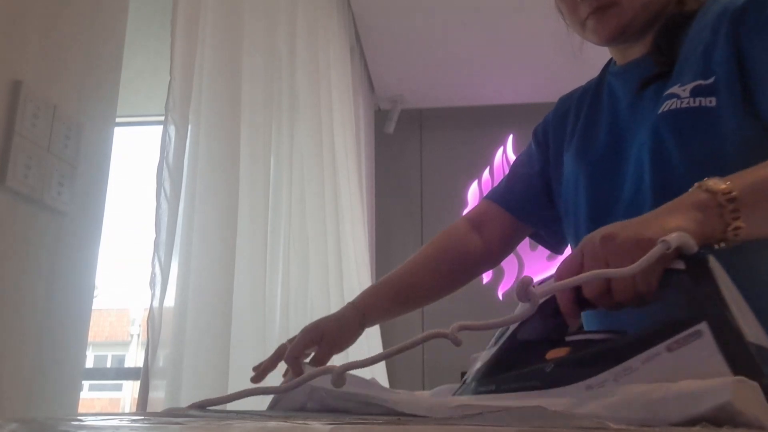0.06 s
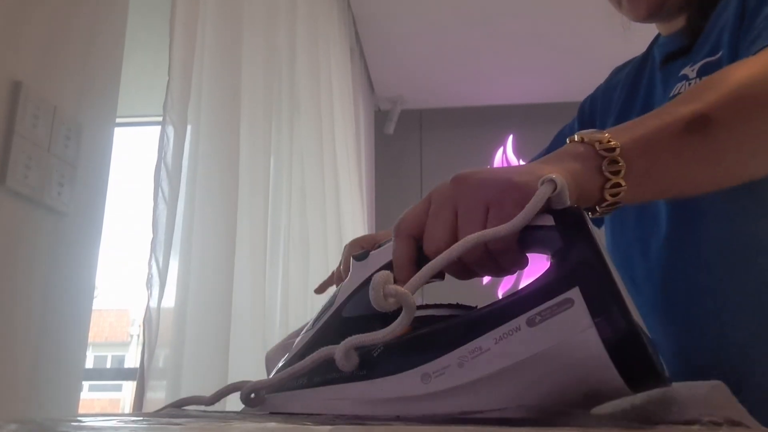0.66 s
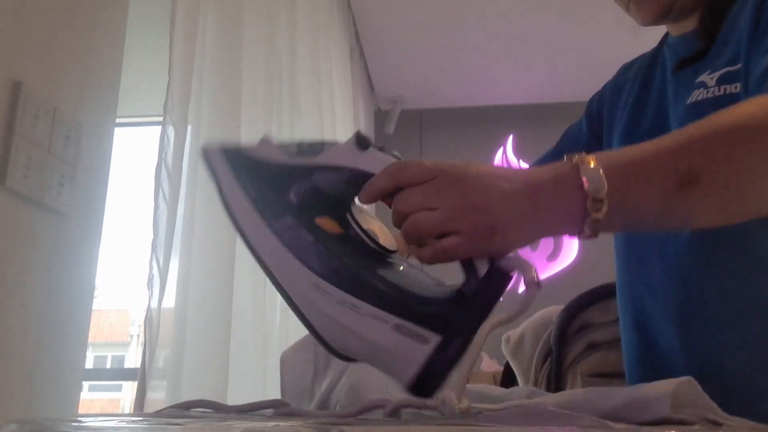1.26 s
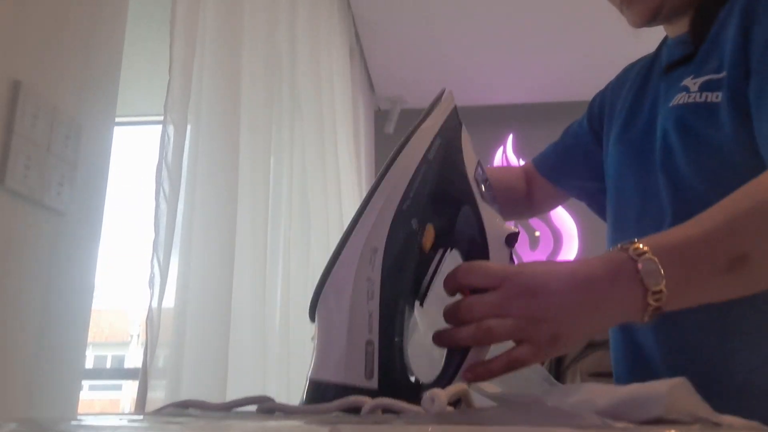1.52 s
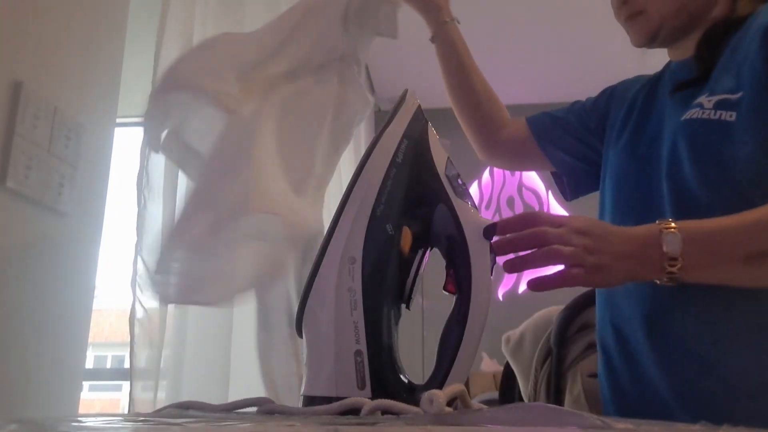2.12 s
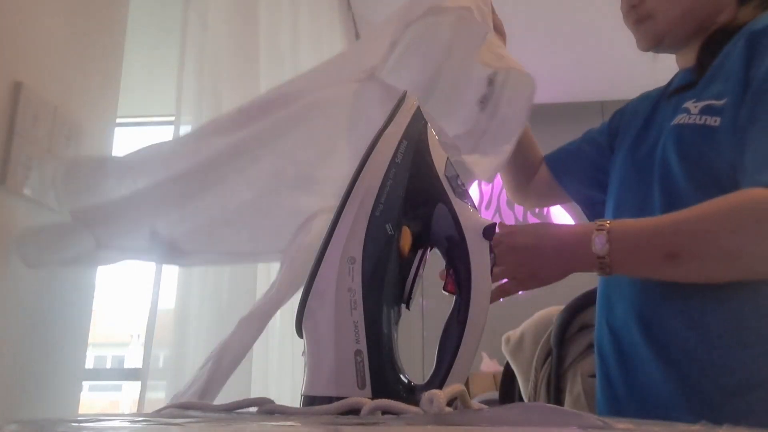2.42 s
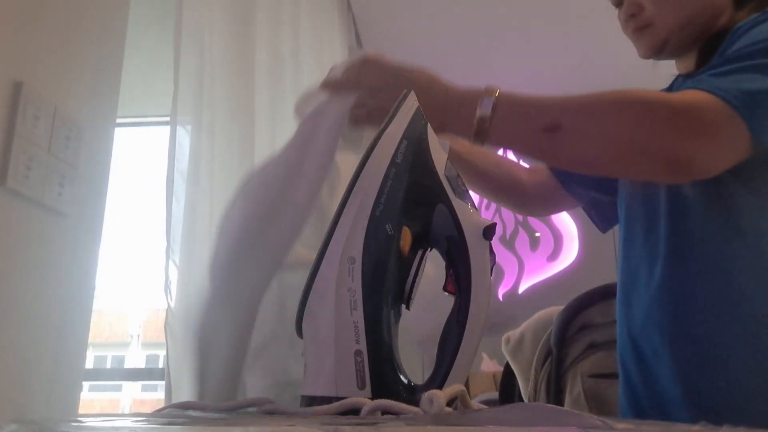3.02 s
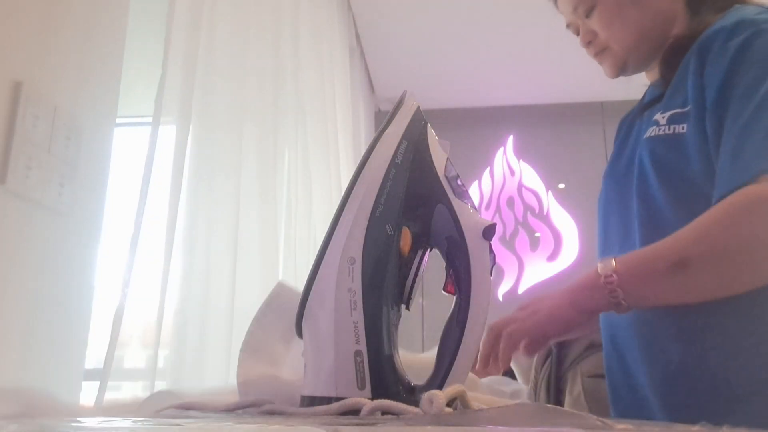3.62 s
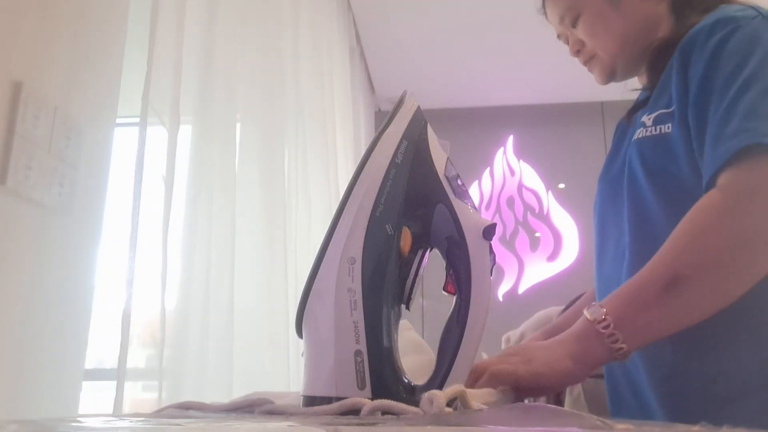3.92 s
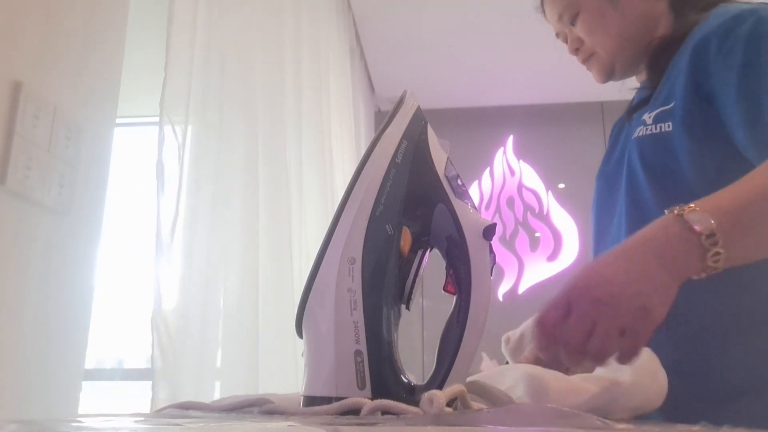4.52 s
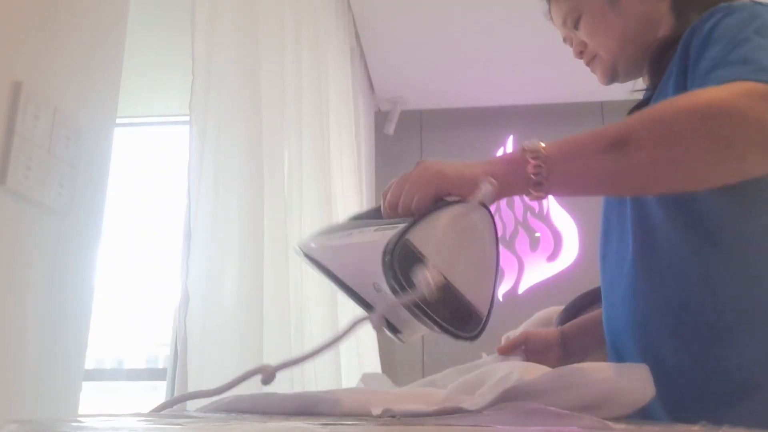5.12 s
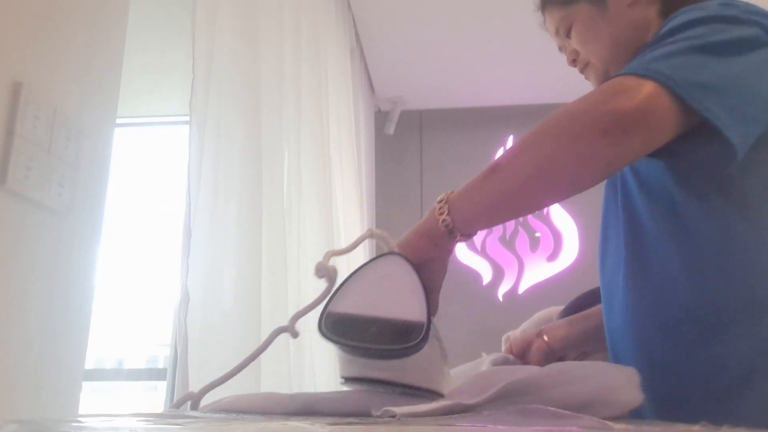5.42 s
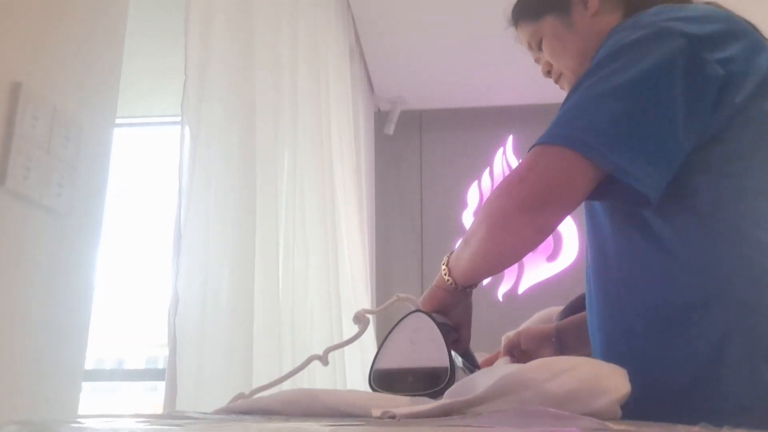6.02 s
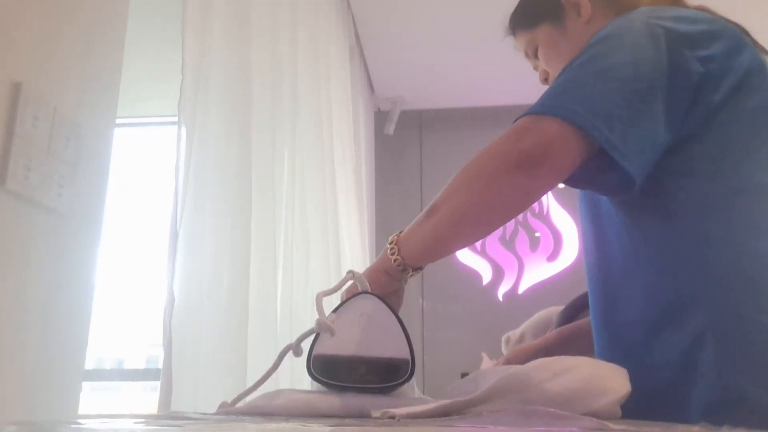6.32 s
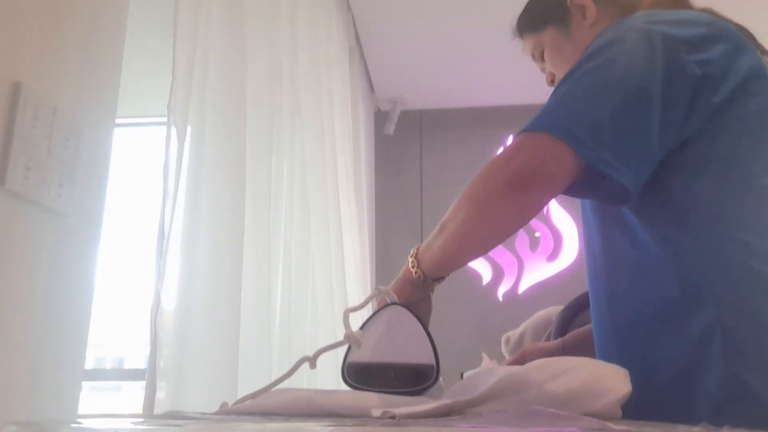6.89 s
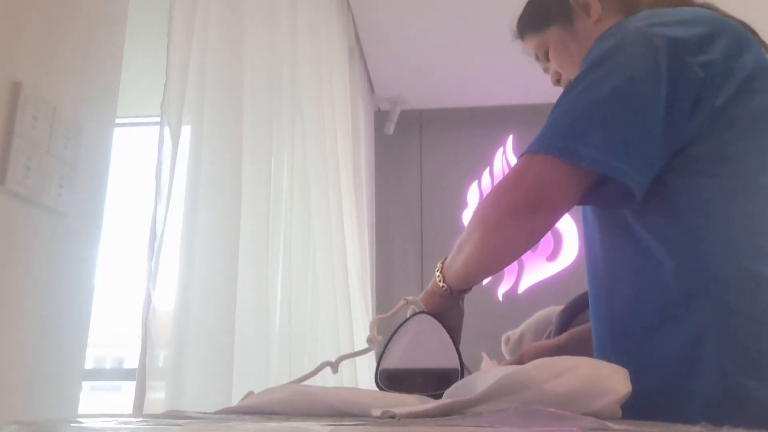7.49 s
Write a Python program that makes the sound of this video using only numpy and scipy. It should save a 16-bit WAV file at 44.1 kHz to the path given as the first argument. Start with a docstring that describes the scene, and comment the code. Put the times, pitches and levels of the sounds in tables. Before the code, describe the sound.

A steam iron slides softly over cloth, its plastic shell ticking and water sloshing inside. It is stood on its heel with a cluster of knocks that shake the springy ironing board, and a hollow hiss swells and fades. A shirt rustles faintly and lands with a dull thump. The iron bumps down again and slides on with small creaks, scrapes and glugs, heard close up in a small, quiet room.

```python
"""Ironing a shirt

A steam iron slides over cloth in a small room, is stood on its heel and rocks the springy board.
A steam-like hiss lingers. The shirt is shaken out, dropped and smoothed; the iron comes down and
slides again. As it moves, its shell ticks, creaks and scrapes and its tank sloshes and glugs."""
import sys
import numpy as np
from scipy import signal
from scipy.fft import rfft, irfft
from scipy.io import wavfile
from scipy.ndimage import uniform_filter1d

SR = 44100
rng = np.random.default_rng(int(sys.argv[2]) if len(sys.argv) > 2 else 0)


def wav_out(sig):
    """Save sig, one row per channel (or a flat mono array), as 16-bit PCM at SR to the path in sys.argv[1]."""
    wavfile.write(sys.argv[1], SR, np.round(np.clip(np.atleast_2d(sig).T, -1, 1) * 32767).astype(np.int16))


N = 341775
TIME = np.arange(N) / SR

# Levels are relative, ahead of mix gains. Pan is left minus right.
# spectra of room tone, cloth, hollow iron and steam-like hiss: f/Hz, density/dB
ROOM_SPECTRUM = [(25, 7.5), (102, -21), (138, 6), (195, -5.5), (451, -6), (962, -16.5), (1350, -37),
                 (3800, -36), (7300, -29.5), (9200, -40), (12500, -31), (16000, -40)]
CLOTH_SPECTRUM = [(150, 12), (600, 16.5), (2000, 0), (3000, 1.5), (3600, 3), (6300, 2.5), (9500, -4),
                  (13000, 2.5), (16000, -10)]
HOLLOW_SPECTRUM = [(120, -3.5), (300, 0.5), (490, 5), (620, 3.5), (900, -3.5), (1400, -10), (1900, -11),
                   (2600, -18.5), (4000, -39.5)]
STEAM_SPECTRUM = [(250, -12.5), (520, -1.5), (850, -10.5), (2250, -24), (2520, -15.5), (2950, -28),
                  (7400, -24), (9000, -32.5)]
# spectrum of the trembling board: f/Hz, density/dB
TREMBLE_SPECTRUM = [(30, -27), (46, 4), (62, 3.5), (90, -7), (140, -7), (220, -28), (600, -56)]
# scuffs of cloth, cord and plastic: t/s, level/dB, f/Hz, t60/s
SCUFF_HITS = [(0.056, -66, 3850, 0.37), (0.152, -53.5, 3700, 0.061), (0.228, -49.5, 3600, 0.082),
              (0.429, -43, 7450, 0.012), (.496, -43, 4860, 0.0076), (0.5301, -20.5, 3350, 0.0061),
              (.535, -64.5, 1940, 0.7), (.898, -52, 4340, 0.032), (.932, -36.5, 3800, 0.012),
              (1.031, -57, 4770, 0.036), (1.321, -58, 2900, 0.29), (1.444, -45, 2970, 0.55),
              (1.715, -50.5, 4370, 0.17), (3.624, -66, 5340, 0.54), (4.757, -54, 6000, 0.034),
              (5.521, -57.5, 4460, 0.33), (6.083, -53.5, 4180, 0.057)]
# iron pushed, lifted or tipped: t/s, length/s, murmur/dB, hiss/dB
IRON_MOVES = [(0.137, 0.29, -58.5, -80), (1.02, 0.94, -62, -86), (1.41, 0.43, -48.5, -65.5),
              (4.932, 0.24, -63, -77), (5.422, 0.16, -59, -83), (5.906, 0.51, -65.5, -78.5),
              (7.312, 0.11, -60, -85)]
# cloth strokes, timed at peak speed: t/s, length/s, level/dB
CLOTH_STROKES = [(0.558, 0.44, -61.5), (3.076, 0.094, -68.5), (4.335, 0.19, -63), (5.029, 0.074, -65.5),
                 (5.604, 0.18, -69), (5.897, 0.26, -70.5)]
# ticks of shell and tank: t/s, level/dB, f/Hz
SHELL_TICKS = [(0.325, -29.5, 636), (.364, -39, 850), (.485, -36.5, 836), (.497, -38.5, 1130),
               (.531, -35.5, 692), (0.641, -39, 1000), (0.934, -32, 1910), (0.965, -41, 566),
               (1.514, -17.5, 880), (2.004, -31.5, 1340), (4.76, -36, 1300), (4.938, -45.5, 1280),
               (4.959, -42, 1570), (5.004, -45.5, 905), (5.121, -39.5, 612), (5.367, -43.5, 460),
               (5.398, -38, 2100), (5.501, -40.5, 885), (5.859, -47, 1080), (6.129, -46.5, 574),
               (6.191, -42.5, 1930), (6.245, -49, 795), (7.022, -46.5, 1220)]
# modes of the iron's shell: f/Hz, level/dB, t60/s
SHELL_MODES = [(464, -4.5, 0.4), (760, 9.5, 0.024), (1000, 9, 0.026), (1125, -6.5, 0.12), (1734, 10, 0.018)]
# air pockets in the tank: t/s, level/dB, f/Hz, t60/s
TANK_GLUGS = [(.643, -45.5, 488, 0.051), (6.716, -46, 458, 0.14), (7.364, -55.5, 451, 0.39)]
# path of the tank's resonance: t/s, level/dB, f/Hz
SLOSH_PATH = [(1.019, -68, 477), (1.218, -59, 614), (1.36, -59.5, 590), (1.849, -61.5, 650),
              (1.999, -58.5, 527), (2.501, -77.5, 604)]
# soft landings and bumps: t/s, level/dB, f/Hz, t60/s
THUD_HITS = [(1.315, -26, 164, 0.025), (1.322, -36, 660, 0.2), (1.448, -36, 555, 0.41),
             (1.514, -30, 1150, 0.09), (1.516, -23.5, 290, 0.12), (1.69, -40, 122, 0.4),
             (3.612, -39, 292, 0.37), (3.635, -32, 117, 0.15), (4.662, -59, 880, 0.19),
             (5.538, -36.5, 316, 0.19), (5.547, -48.5, 1610, 0.15), (5.599, -42.5, 237, 0.66),
             (6.453, -69, 1130, 0.097), (6.714, -44.5, 373, 0.49), (6.753, -46, 1050, 0.082),
             (7.226, -67.5, 1390, 0.37), (7.372, -49, 456, 0.27)]
# blows to the board: t/s, level/dB, pan/dB
BOARD_BLOWS = [(1.315, -27.5, 12), (1.438, -19, 1), (1.522, -21, 19.5), (1.541, -35, -16), (1.683, -26, -2),
               (3.656, -36, 9), (3.802, -42, 8), (4.008, -47, 10), (5.558, -32.5, 12), (6.758, -45.5, 8)]
# modes of the board on its legs: f/Hz, level/dB, t60/s, pan/dB
BOARD_MODES = [(48.5, -10, 0.35, -20), (61.7, 8.5, 0.15, -14), (108.6, 2.5, 0.11, -1),
               (140, -1.5, 0.19, -0.5), (298.8, -13, 0.26, -0.5)]
# heel coming down: t/s, level/dB, f/Hz, t60/s, rise/s
HEEL_HITS = [(1.525, -32.5, 5600, 0.036, 0.00048)]
# hiss of the upright iron: t/s, length/s, level/dB
STEAM_PUFFS = [(1.54, 0.51, -54)]
# touches on the standing iron: t/s, level/dB, lowest f/Hz, highest f/Hz, t60/s
CLINK_HITS = [(2.004, -44.5, 1260, 1420, 0.26), (2.331, -56.5, 3660, 6200, 0.21),
              (4.757, -57.5, 3240, 4870, 0.34)]
# stick-slip runs over the cloth: t/s, length/s, level/dB, f/Hz
CREAK_RUNS = [(5.985, 0.031, -56.5, 1800), (7.407, 0.077, -57, 1520), (7.562, 0.34, -67, 1820)]
# modes rung by a slip: frequency ratio, level/dB, t60/s
SLIP_MODES = [(1, 0.5, 0.015), (1.88, -8, 0.014)]
# scrapes as the iron changes direction: t/s, level/dB, f/Hz, t60/s
SCRAPE_HITS = [(6.676, -58.5, 4950, 0.46), (6.954, -62, 4440, 0.53), (7.301, -43.5, 9100, 0.035),
               (7.308, -59, 7000, 0.45), (7.709, -60.5, 5540, 1)]

MOVE_ATTACK_S, MOVE_T60_S = 0.009, 0.77  # tank water settles slowly
SCUFF_RISE_S = 0.003


def undb(db):
    """Decibels to gain."""
    return 10 ** (np.asarray(db) / 20)


def unit(x):
    """Scale to rms 1."""
    return x / np.sqrt(np.mean(x ** 2))


def colour(x, spectrum):
    """Shape x by a spectrum; rms 1."""
    hz, db = np.transpose(spectrum)
    f = np.maximum(np.arange(N // 2 + 1) * SR / N, 1)
    gain = undb(np.interp(np.log(f), np.log(hz), db))
    low_cut = np.minimum(f / hz[0], 1) ** 2
    return unit(irfft(rfft(x) * gain * low_cut, N))


def band(x, hz, spread):
    """Band-pass from hz / spread to hz * spread."""
    edges_hz = [hz / spread, min(hz * spread, SR * 0.45)]
    return signal.sosfilt(signal.butter(2, edges_hz, "band", fs=SR, output="sos"), x)


def walk(rate_hz):
    """Random levels joined by ramps; rms 1."""
    hold = int(SR / rate_hz)
    steps = np.repeat(rng.standard_normal(N // hold + 1), hold)
    return unit(uniform_filter1d(steps, hold)[:N])


def fade(t, t60_s):
    """Exponential decay, 60 dB in t60_s."""
    return np.exp(-np.log(1000) * t / t60_s)


def ring(modes, t):
    """Damped sines of a struck body."""
    return sum(undb(db) * np.sin(2 * np.pi * hz * t) * fade(t, t60_s) for hz, db, t60_s in modes)


def add(out, at_s, x):
    """Mix x into out."""
    i = max(int(at_s * SR), 0)
    out[..., i:i + x.shape[-1]] += x[..., :N - i]


def pan(x, left_db):
    """Tip left or right; the right lags by 0.1 ms."""
    left, right = np.broadcast_to(x, (2, N))
    late_right = np.pad(right, (5, 0))[:N]
    return np.array([left * undb(left_db / 2), late_right * undb(-left_db / 2)])


def diffuse(size, bass_side=0.38, unrelated_hz=2300):
    """Stereo noise: alike in the bass, unrelated in the treble."""
    mid, side = rfft(rng.standard_normal((2, size)))
    f = np.arange(size // 2 + 1) * SR / size
    side = side * np.minimum(np.hypot(bass_side, f / unrelated_hz), 1)
    return irfft(np.array([mid + side, mid - side]), size)


def impulses(size, rate_hz):
    """Impulses of random time and strength."""
    return (rng.random(size) < rate_hz / SR) * rng.standard_normal(size)


def together(*gains):
    """Add gains in power."""
    return np.sqrt(sum(gain ** 2 for gain in gains))


def gestures(table, attack_s, t60_s):
    """Envelope of events that swell, hold and die away."""
    gains = []
    for at_s, length_s, db in table:
        swell = np.sin(np.pi / 2 * np.clip((TIME - at_s) / attack_s, 0, 1))
        release = fade(np.maximum(TIME - at_s - length_s, 0), t60_s)
        gains.append(undb(db) * swell * release)
    return together(*gains)


def bursts(table, spread, grit_db):
    """Contacts as uneven band noise that builds and decays."""
    out, t = np.zeros((2, N)), TIME[:SR // 2]
    for at_s, db, hz, t60_s, rise_s in table:
        grit = undb(grit_db * walk(300)[:len(t)])
        noise = band(diffuse(len(t)) * grit, hz, spread)
        envelope = fade(t, t60_s) * (1 - np.exp(-t / rise_s))
        add(out, at_s, undb(db) * noise / np.std(noise.mean(axis=0)) * envelope)
    return out


def room_tone(level_db=-64):
    """Steady low noise of the room."""
    return undb(level_db) * colour(diffuse(N), ROOM_SPECTRUM)


def scuffs():
    """Cloth, cord and plastic brush in crisp bursts."""
    hits = [(*row, SCUFF_RISE_S) for row in SCUFF_HITS]
    return pan(bursts(hits, spread=1.72, grit_db=-1), left_db=-1.5)


def iron_murmur(motion, rest_db=-75):
    """Rubbing and sloshing resound in the hollow iron."""
    murmur = colour(diffuse(N), HOLLOW_SPECTRUM) * undb(2.5 * walk(40))
    return pan(murmur, left_db=-4) * together(motion, undb(rest_db))


def cloth(slowing_ratio=0.77, scatter_db=3.5):
    """Fibres hiss under hand and iron; threads catch and let go."""
    hiss = colour(diffuse(N), CLOTH_SPECTRUM) * undb(1.5 * walk(45))
    grains = impulses(N, rate_hz=1100) * undb(scatter_db * np.minimum(rng.exponential(size=N), 4))
    catches = colour(grains * rng.choice([-1, 1], (2, N)), CLOTH_SPECTRUM)
    moves = [(at_s, length_s, db) for at_s, length_s, _, db in IRON_MOVES]
    under_iron = gestures(moves, MOVE_ATTACK_S, MOVE_T60_S)
    strokes = []
    for at_s, length_s, db in CLOTH_STROKES:
        width_s = length_s / 2 * np.where(TIME < at_s, 1, slowing_ratio)
        strokes.append(undb(db) * np.exp(-0.5 * ((TIME - at_s) / width_s) ** 2))
    return (undb(2.5) * hiss + undb(-2) * catches) * together(under_iron, *strokes)


def tick(hz, t60_s, chatter_db, overtone=1.535, contact_s=0.0003):
    """A blow and a chatter of loose plastic ring one spot and the shell."""
    t = TIME[:SR // 6]
    chatter = impulses(len(t), rate_hz=1500) * fade(t, 0.17) * (t > 0.002)
    blows = (t == 0) + undb(chatter_db) * chatter / np.linalg.norm(chatter)
    spot = ring([(hz, 0, t60_s), (hz * overtone, -7, t60_s / overtone)], t)
    shell = undb(-22) * ring(SHELL_MODES, t)
    onset = 1 - np.exp(-t / contact_s)
    return signal.fftconvolve(blows, (spot + shell) * onset)


def ticks(motion, t60_at_1khz_s=0.017, damping_power=1.34, rattle_count=360):
    """Shell and tank tick; loose parts rattle as the iron moves."""
    out = np.zeros(N)
    for at_s, db, hz in SHELL_TICKS:
        t60_s = t60_at_1khz_s * (hz / 1000) ** -damping_power
        chatter_db = min(-49 - db, -4)  # firm blows are clean, light ones chatter
        add(out, at_s, undb(db) * tick(hz, t60_s, chatter_db))
    play = np.minimum(motion, undb(-60))  # loose parts have limited travel
    for when, pitch, size in rng.random((rattle_count, 3)):
        gain = play[int(when * N)] * undb(-6 + 9.7 * size)
        add(out, when * N / SR, gain * tick(hz=600 * 3.2 ** pitch, t60_s=0.04, chatter_db=-4))
    return pan(out, left_db=-2)


def glugs(rise_s=0.0063, glide_hz_per_s=310):
    """Air pockets in the tank sound short rising notes."""
    out, t = np.zeros(N), TIME[:SR // 4]
    for at_s, db, hz, t60_s in TANK_GLUGS:
        swell = (1 - np.exp(-t / rise_s)) ** 2 * fade(t, t60_s)
        note = np.sin(2 * np.pi * (hz + glide_hz_per_s * t / 2) * t)
        add(out, at_s, undb(db) * swell / swell.max() * note)
    return out


def slosh(width_hz=90):
    """A narrow resonance wanders as water shifts in the tank."""
    at_s, db, hz = np.transpose(SLOSH_PATH)
    phase = 2 * np.pi * np.cumsum(np.interp(TIME, at_s, hz)) / SR
    note = walk(width_hz) * np.cos(phase) + walk(width_hz) * np.sin(phase)
    active = (TIME > at_s[0]) & (TIME < at_s[-1])
    return note * undb(np.interp(TIME, at_s, db)) * active


def thuds(rise_per_t60=0.028):
    """Iron and shirt land on the padding, the hand bumps the iron; softer means slower."""
    hits = [(at_s, db, hz, t60_s, rise_per_t60 * t60_s) for at_s, db, hz, t60_s in THUD_HITS]
    return pan(bursts(hits, spread=1.53, grit_db=0.5), left_db=-3.5)


def board_bounce(push_s=0.0018, rise_s=0.0097, lag_s=0.00068):
    """Blows set the board bouncing on its legs."""
    pushes, t = np.zeros((2, N)), TIME[:SR]
    push = np.sin(np.pi * np.minimum(t / push_s, 1)) / (push_s * SR)
    for at_s, db, left_db in BOARD_BLOWS:
        add(pushes, at_s, np.outer(undb([db + left_db / 2, db - left_db / 2]), push))
    out = np.zeros((2, N))
    for hz, db, t60_s, left_db in BOARD_MODES:
        mode = ring([(hz, db, t60_s)], t) * (1 - np.exp(-t / rise_s))
        out += pan(signal.fftconvolve(pushes, mode[None], axes=1)[:, :N], left_db)
    out[0] = np.interp(TIME - lag_s, TIME, out[0])  # flexing reaches the left later
    return signal.sosfilt(signal.butter(3, 40, "high", fs=SR, output="sos"), out)


def board_tremble(motion, attack_s=0.015, t60_s=0.65, rest_db=-65.5):
    """The board rumbles after blows and under the moving iron, faintly at rest."""
    rumble = colour(diffuse(N, bass_side=0.46), TREMBLE_SPECTRUM)
    shaken = gestures([(at_s, attack_s, db - 5) for at_s, db, _ in BOARD_BLOWS], attack_s, t60_s)
    return rumble * together(shaken, undb(2.5) * motion, undb(rest_db))


def heel_crack():
    """The iron's hard heel cracks down."""
    return bursts(HEEL_HITS, spread=2.4, grit_db=5)


def steam_hiss():
    """A hollow hiss, like vapour seeping through the iron, swells and dies."""
    hiss = colour(diffuse(N), STEAM_SPECTRUM) * undb(1.5 * walk(30))
    return pan(hiss, left_db=-2) * gestures(STEAM_PUFFS, attack_s=0.37, t60_s=0.99)


def clinks(mode_count=40, mode_t60_s=0.031):
    """Loose parts clink at a touch: a dying rattle drives close modes, densest at the low end."""
    out, t = np.zeros(N), TIME[:SR // 2]
    for at_s, db, low_hz, high_hz, t60_s in CLINK_HITS:
        modes_hz = low_hz * (high_hz / low_hz) ** (rng.random(mode_count) ** 2)
        body = ring([(hz, 0, mode_t60_s) for hz in modes_hz], t[:SR // 20])
        rattle = rng.standard_normal(len(t)) * fade(t, t60_s)
        clink = signal.fftconvolve(rattle, body)
        add(out, at_s, undb(db) * clink / np.abs(clink).max())
    return out


def creaks(slip_hz=62, jitter=0.12, scatter_db=2, rub_db=-6):
    """Stick-slip pulses, with rubbing between, ring one spot of the shell."""
    slip_count = np.floor(np.cumsum(slip_hz * (1 + jitter * walk(slip_hz))) / SR)
    slips = np.diff(slip_count, prepend=0) * undb(scatter_db * walk(slip_hz))
    rubbing = undb(rub_db) * np.sqrt(slip_hz / SR) * rng.standard_normal(N)
    out = np.zeros(N)
    for at_s, length_s, db, hz in CREAK_RUNS:
        progress = np.clip((TIME - at_s) / length_s, 0, 1)
        pressure = np.sqrt(np.abs(np.sin(np.pi * progress)))
        modes = [(hz * ratio, mode_db, t60_s) for ratio, mode_db, t60_s in SLIP_MODES]
        body = ring(modes, TIME[:SR // 20])
        out += undb(db) * signal.oaconvolve((slips + rubbing) * pressure, body)[:N]
    return out


def scrapes(metal_hz=(2500, 14100), metal_t60_s=0.014):
    """Grit, bare and through metal that has other modes at each spot."""
    out = np.zeros((2, N))
    for row in SCRAPE_HITS:
        grit = bursts([(*row, SCUFF_RISE_S)], spread=2.06, grit_db=2)
        modes = [(hz, 0, metal_t60_s) for hz in rng.uniform(*metal_hz, size=30)]
        metal = ring(modes, TIME[:SR // 10])
        ringing = signal.oaconvolve(grit, metal[None] / np.linalg.norm(metal), axes=1)[:, :N]
        out += undb(-1) * grit + undb(-10) * ringing
    return out


def room(x, tail_db, near_db=-12, t60_s=0.44):
    """Add quick reflections off board and iron, then the small room's tail."""
    t = TIME[:SR // 2]
    near = diffuse(len(t)) * fade(t, 0.05) * (t > 0.002)
    tail = diffuse(len(t)) * fade(t, t60_s) * (t > 0.008)
    echo = (undb(near_db) * unit(near) + undb(tail_db) * unit(tail)) / np.sqrt(len(t))
    return x + signal.fftconvolve(x, echo, axes=1)[:, :N]


def scene():
    """Iron, shirt and board over room tone; motion drives murmur, rattle and tremble."""
    moves = [(at_s, length_s, db) for at_s, length_s, db, _ in IRON_MOVES]
    motion = gestures(moves, MOVE_ATTACK_S, MOVE_T60_S)
    soft = thuds()
    crisp = scuffs()
    close = heel_crack()
    crisp += ticks(motion) + clinks()
    close += pan(scrapes() + undb(6) * (creaks() + glugs()), left_db=-2.5)
    air = room_tone()
    contacts = room(soft, tail_db=-2.5) + room(crisp, tail_db=-5) + room(close, tail_db=-16.5)
    board = undb(2) * board_bounce() + board_tremble(motion)
    return board + contacts + cloth() + iron_murmur(motion) + slosh() + steam_hiss() + air


def record(dry, shelf_hz=8000, shelf_db=2, top_hz=15900):
    """Tip the treble to the left and cut the top."""
    f = np.arange(N // 2 + 1) * SR / N
    left_db = shelf_db * f ** 2 / (f ** 2 + shelf_hz ** 2)
    tipped = irfft(rfft(dry) * undb([left_db / 2, -left_db / 2]), N)
    return signal.sosfilt(signal.ellip(10, 0.2, 80, top_hz, fs=SR, output="sos"), tipped)


dry = scene()
out = record(dry)
wav_out(out)
```